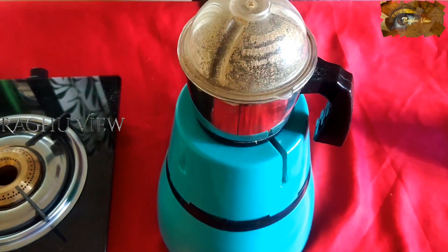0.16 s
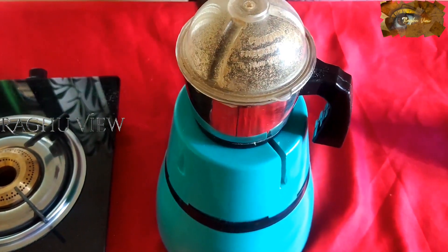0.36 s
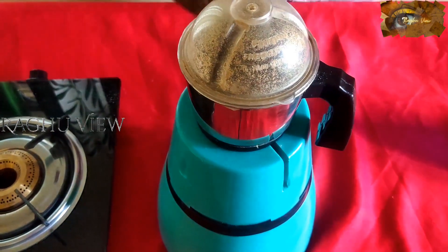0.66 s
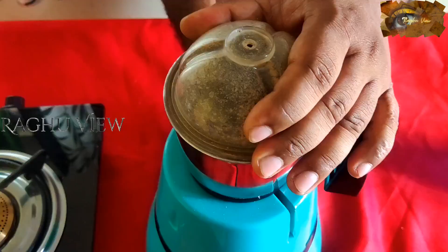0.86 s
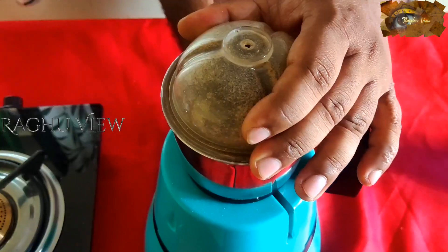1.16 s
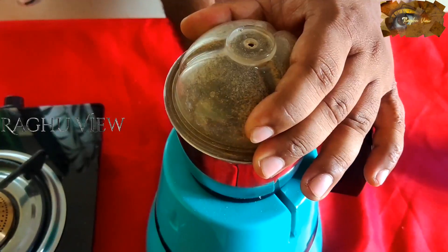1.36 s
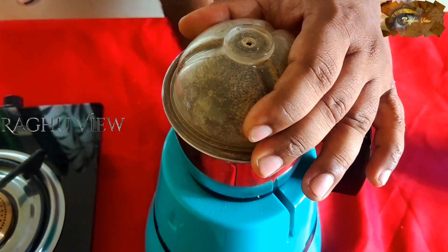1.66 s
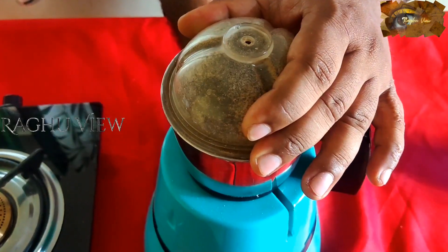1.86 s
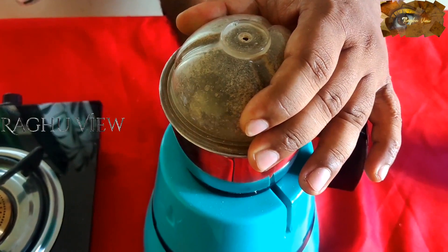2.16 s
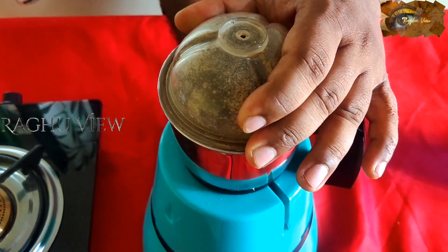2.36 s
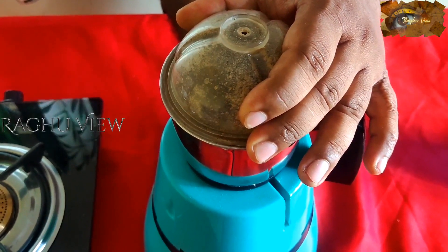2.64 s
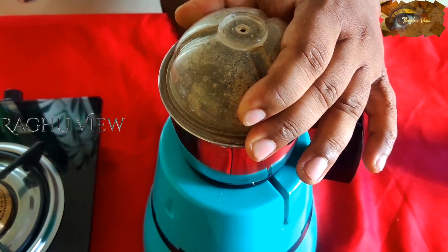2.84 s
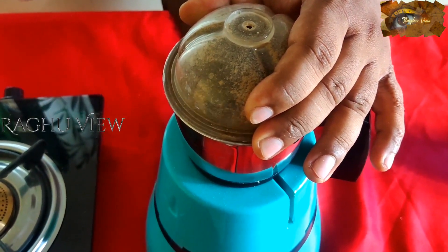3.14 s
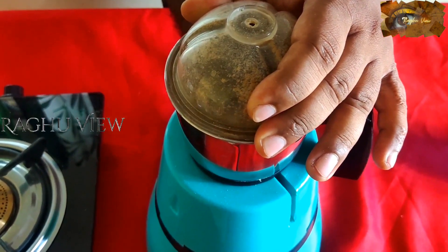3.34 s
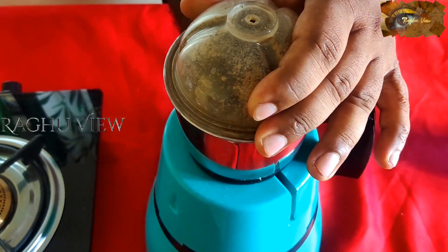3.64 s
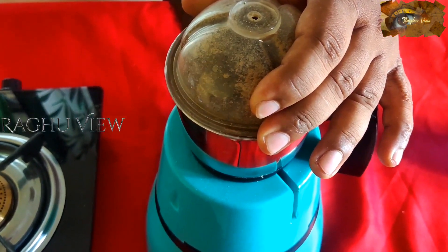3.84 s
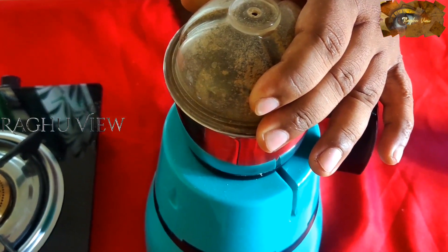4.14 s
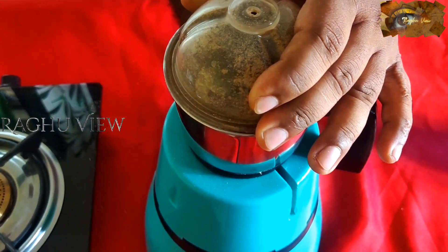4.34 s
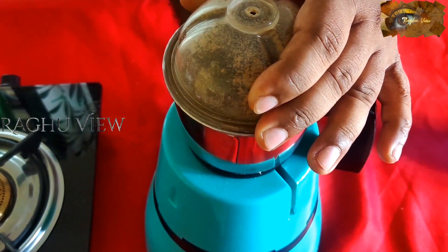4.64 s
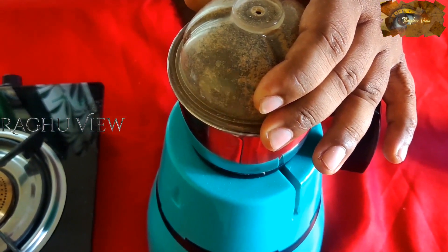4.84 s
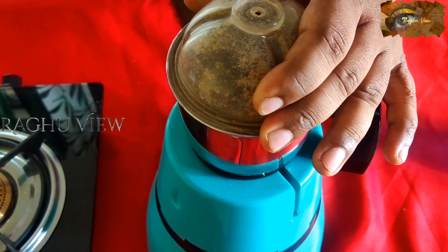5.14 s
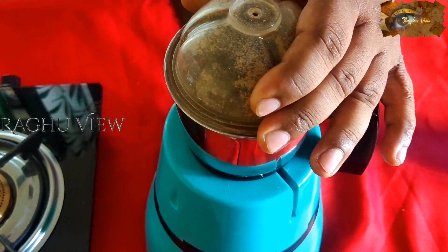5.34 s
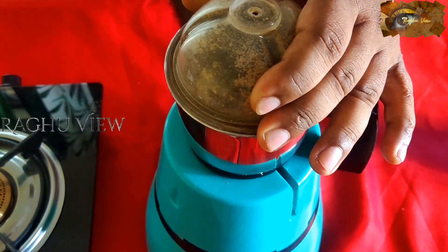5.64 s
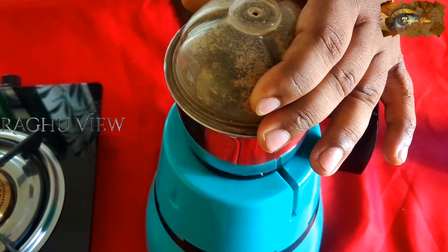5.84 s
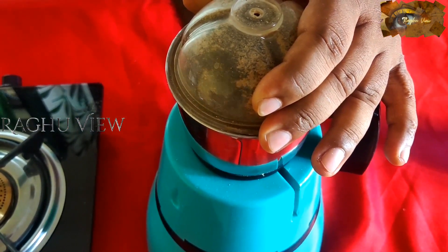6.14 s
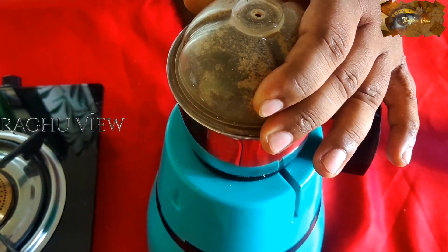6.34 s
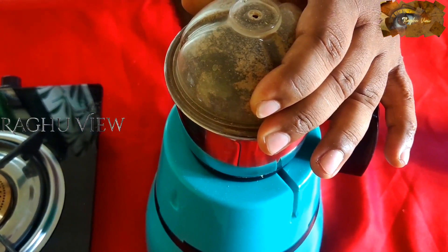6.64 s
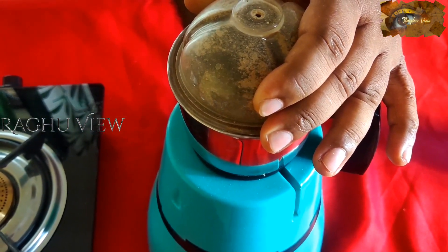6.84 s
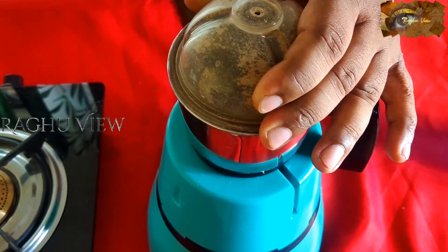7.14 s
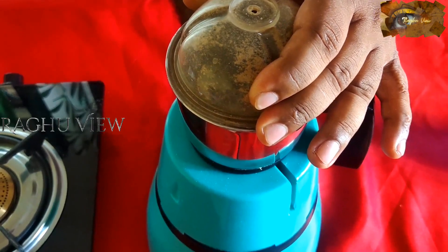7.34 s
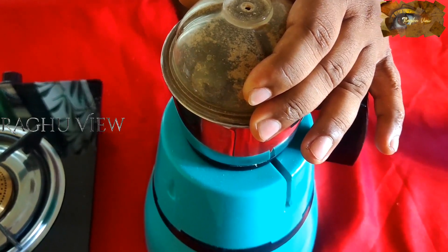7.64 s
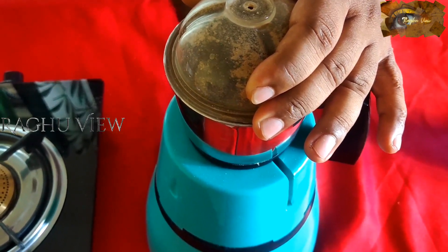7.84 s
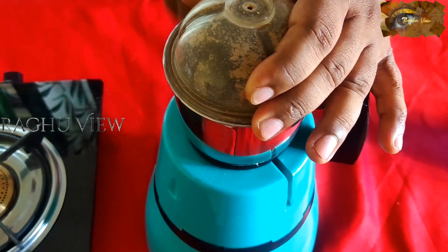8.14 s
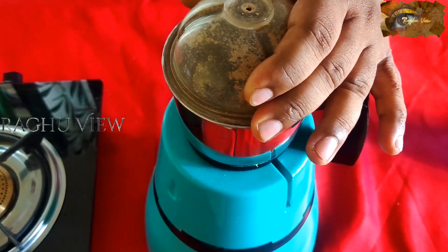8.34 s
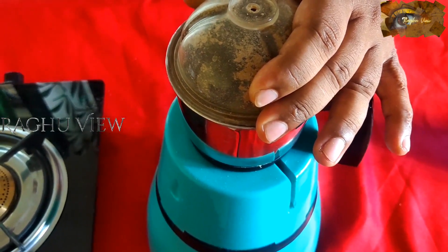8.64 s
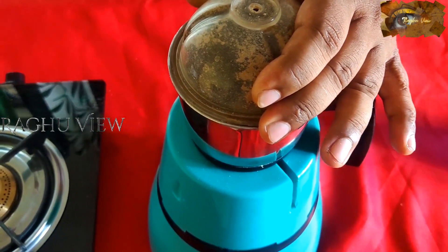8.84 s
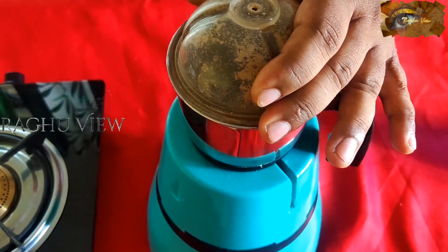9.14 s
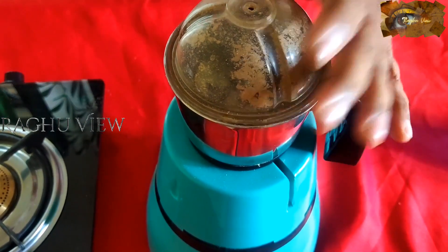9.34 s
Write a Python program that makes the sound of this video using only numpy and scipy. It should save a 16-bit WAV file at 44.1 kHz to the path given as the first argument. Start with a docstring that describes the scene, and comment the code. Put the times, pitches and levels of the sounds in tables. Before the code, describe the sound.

A brief knock and a dying rattle come first. Then a kitchen mixer grinder starts up, its motor whine quickly rising and holding while dry spice hisses against the ringing steel jar. Puffs of air thump on the close microphone. After about six and a half seconds the motor is switched off and winds down, the jar clacking on its drive until it stops.

```python
"""First comes a knock and a dying rattle; then a kitchen mixer grinder starts up with a loud hiss and whine.
Dry spice grains spray on its steel jar and make it ring, while the blades beat the air at up to about
214 turns a second. The jar rattles and knocks on its coupler (the drive joint), the plastic housing
drones, and puffs of air thump on the close microphone. Switched off, the rotor coasts to a clacking stop."""
import sys
import numpy as np
from scipy import signal
from scipy.fft import rfft, irfft, next_fast_len
from scipy.io import wavfile

SR = 44100
rng = np.random.default_rng(int(sys.argv[2]) if len(sys.argv) > 2 else 0)


def waveform_to_disk(signal):
    """Save audio, clipped to [-1, 1], as 16-bit WAV at the path in sys.argv[1]."""
    frames = np.transpose(np.atleast_2d(signal))
    scaled = np.clip(frames, -1, 1) * 32767
    samples = np.round(scaled).astype(np.int16)
    wavfile.write(sys.argv[1], SR, samples)


N = 418499
SWITCH_ON_S, SWITCH_OFF_S = 0.75, 7.375
ECHO_S, CUTOFF_HZ = 0.45, 15600  # time for the kitchen's echo to fall 60 dB; highest pitch kept

# tone of the grains' hits; a positive pan leans left: (pitch [Hz], level [dB], pan [dB])
GRAIN_TONE = [(90, -22, -11.5), (201, -6.5, -8), (600, -11, -0.5), (2240, -7.5, 1.5), (2870, -5, -1),
              (3910, -6.5, 1), (4910, -9, -1.5), (5930, -1.5, 3), (6980, 3.5, 4.5), (7730, -2.5, -3),
              (8580, 1, -2.5), (10520, -6, -0.5), (11840, -5, 0), (13900, -1, 4.5), (15500, -5, -4.5)]
def grain_hiss(hail, speed, crest_s=0.842, surge_period_s=0.355):
    """Spice sprays on the steel wall; coarse grains are the brightest, and they come in surges."""
    coarse = coarseness()
    surge_db = 0.5 * np.sqrt(coarse) * np.cos(2 * np.pi * since(crest_s) / surge_period_s)
    gain = loudness(speed, powered_db=-12.5, coarse_db=-0.7, coasting_db=-21.5,
                    knee_speed=55.3, steepness=1.42, die_db_per_s=131)
    cushion = swirling() ** 3  # flying powder softens the hits and is the first thing to settle
    powered_db = -8 + 11.5 * np.cbrt(coarse)
    coasting_db = 6 + 2 * np.log2(speed / 100)
    treble_db = cushion * powered_db + (1 - cushion) * coasting_db
    spray = stereo_noise(GRAIN_TONE) * hail
    treble = spray - butter(spray, 10000, "low", order=1)
    return from_db(surge_db) * gain * (spray + treble * (from_db(treble_db) - 1))


def grain_hits(speed, turns, per_turn=28, bunching=0.4, ring_s=0.00075, echo=0.5):
    """Loudness of a hail of hits: they bunch once a turn, come in clumps and thin as the rotor slows."""
    sweep = np.cos(2 * np.pi * turns) + np.cos(4 * np.pi * turns) / 2
    hits_per_s = per_turn * speed * (1 + bunching * sweep)
    hits = rng.random(N) < hits_per_s / SR
    sizes = from_db(3.5 * np.minimum(rng.exponential(1, N), 4) + 1.76 * drift(25))
    power = fade(fade(hits * sizes ** 2 / speed, ring_s), 0.000099)
    power = power / np.mean(power[speed > 100])
    return np.sqrt(with_echo(power, echo) / (1 + echo))


# notes of the steel wall: (pitch [Hz], width [Hz], left boost [dB], right boost [dB])
WALL_NOTES = [(2727, 58, 7, 5.5), (3100, 110, 4.5, 2), (3590, 240, 5.5, 5.5), (4070, 107, 10, 7),
              (4720, 39, 14.5, 6), (5330, 71, 5.5, 6.5), (6130, 75, 2.5, 5.5), (6300, 130, 2.5, -1),
              (7120, 50, 0.5, 5.5), (7310, 84, 3.5, -1), (7720, 80, 8, -5), (8530, 120, 0, 6.5),
              (9340, 77, 8.5, 0), (10070, 33, 11.5, 7), (11030, 130, 2.5, 9), (11950, 110, 13, 0),
              (13200, 45, -2, 2), (12900, 250, 6.5, -0.5), (13630, 110, 2.5, -3), (15000, 40, 0.5, 4)]
def steel_ring(strikes):
    """Whatever strikes the wall makes it ring."""
    return strikes + sum((from_db([[left_db], [right_db]]) - 1) * band(strikes, hz, width)
                         for hz, width, left_db, right_db in WALL_NOTES)


# the whine's weaker tones: (multiple of rotor speed [x], relative level [dB], pan [dB])
WEAK_TONES = [(1, -26.5, -21.5), (2, -12.5, -0.5), (4, -8.5, -3.5), (5, -8.5, 11.5), (6, -6, -12),
              (7, -13, 10), (8, -13, -14), (14, -18.5, -3.5), (15, -14.5, 1), (19, -10.5, 8)]
def blade_whine(speed, turns, flutter=0.13, rough=0.4, rise_s=0.51, fade_db_per_s=32):
    """Three blades beat the air; the swirling powder makes the higher tones flutter."""
    slack = 1 - swirling()  # without drive the coupler is loose, and the tones blur
    phase = 2 * np.pi * (turns + 0.0055 * drift(14) + 0.02 * slack * drift(30))
    running = np.minimum(since(SWITCH_ON_S) / rise_s, 1) * from_db(-fade_db_per_s * since(SWITCH_OFF_S))
    base_db = -22 + 0.93 * drift(3)

    def tone(k, unrest):
        """A tone at k times the rotor speed, wavering a little differently on each side."""
        waver = np.array([drift(28) + 1j * drift(35) for side in range(2)]) + drift(27) + 1j * drift(35)
        steady = np.exp(1j * (k * phase + rng.uniform(0, 2 * np.pi)))
        return np.sqrt(2) * np.real((1 + unrest * waver / 2) * steady)

    # the blade tone swells at the note of the air in the jar; coarse spice damps it
    in_tune = nearness(3 * speed, 635, 19) ** 2
    damping = coarseness() ** 2
    blade_db = -16.5 - 1.5 * freeing() - 8 * damping + 0.93 * drift(2.4)
    out = from_db(blade_db) * in_tune * panned(-5.5 * in_tune ** 2) * tone(3, flutter)
    # three higher tones swell where they meet a note of the jar
    seventh_gain = from_db(base_db + 2.5 - 6 * slack) * nearness(7 * speed, 1410, 19) ** 2
    out += seventh_gain * panned(6) * tone(7, rough * 2)
    out += from_db(base_db + 1.5) * nearness(9 * speed, 1934, 42) * panned(1.6) * tone(9, rough * 1.05)
    out += from_db(base_db - 3.5) * nearness(10 * speed, 2054, 11) * tone(10, rough)
    weak_db = base_db - 2.5 - 4.8 * slack - 3 * damping
    for k, level_db, pan_db in WEAK_TONES:
        out += from_db(weak_db + level_db) * panned(pan_db) * tone(k, rough)
    return running * out


# the rotor's basic speed under power, rising as the load eases: (time [s], speed [turns/s])
POWERED_SPEED = [(0.8, 156.0), (0.82, 158.9), (0.85, 170.9), (0.92, 177.2), (0.97, 194.0), (1.11, 202.3),
                 (1.35, 205.9), (2.58, 209.6), (2.6, 211.8), (4.7, 212.8)]
def rotor_speed(drag_per_s=0.74, friction_turns_per_s2=70):
    """Turns a second: a slow creep, the powered run, then a coast against air drag and friction."""
    powered = np.interp(since(0), *np.transpose(POWERED_SPEED))
    powered = powered + 1.5 * freeing() + 0.22 * drift(2.5)  # the shifting load makes it wander
    offset = friction_turns_per_s2 / drag_per_s
    slowing = (powered + offset) * np.exp(-drag_per_s * since(SWITCH_OFF_S)) - offset
    return np.where(since(SWITCH_ON_S) > 0, np.maximum(slowing, 10), 15)


def swirling(hold_s=0.045, settle_s=0.037):
    """Share of the spice that the blades keep in the air: 1 under power, 0 once it has settled."""
    return (since(SWITCH_ON_S) > 0) * np.exp(-since(SWITCH_OFF_S + hold_s) / settle_s)


def coarseness(grind_s=1.5):
    """Share of the spice that is swirling and not yet powder."""
    return swirling() * np.exp(-since(SWITCH_ON_S) / grind_s)


def freeing(start_s=6.7, takes_s=0.6):
    """Rises from 0 to 1 as the powder packs on the wall and the blades run freer."""
    return np.minimum(since(start_s) / takes_s, 1)


def loudness(speed, powered_db, coarse_db, coasting_db, knee_speed, steepness, die_db_per_s):
    """Gain of a rattling part: it follows the spice, falls below the knee speed and dies at each stop."""
    first_stop_s, second_stop_s, fling_s = 0.061, 8.95, 0.018
    level_db = coasting_db + (powered_db - coasting_db) * swirling() + coarse_db * coarseness()
    slowing = (speed / np.hypot(speed, knee_speed)) ** steepness
    flung_up = np.sqrt(np.minimum(since(SWITCH_ON_S) / fling_s, 1))
    first_burst = from_db(-die_db_per_s * since(first_stop_s))
    second_burst = flung_up * from_db(-die_db_per_s * since(second_stop_s))
    return from_db(level_db) * slowing * np.where(flung_up > 0, second_burst, first_burst)


# notes of the jar and the air in it: (pitch [Hz], width [Hz], level [dB], pan [dB])
JAR_NOTES = [(623, 77, -5, 0), (803, 160, -7.5, 0.5), (1021, 130, -10.5, 3), (1377, 65, 1.5, 5.5),
             (1828, 73, -0.5, 3.5), (2025, 102, -1.5, 0.5), (2675, 160, -10.5, -2.5),
             (3545, 260, -13.5, -5), (4220, 110, -16.5, -4)]
def jar_rattle(speed, hail):
    """The grains and the loose coupler shake the jar, which rings at its own notes."""
    chatter = from_db(1.4 * drift(45))
    ringing = rms_one(resonate(stereo_noise() * hail * chatter, JAR_NOTES))
    return ringing * loudness(speed, powered_db=-22, coarse_db=4.5, coasting_db=-20.5,
                              knee_speed=44, steepness=1.46, die_db_per_s=144)


# tone of a knock: (pitch [Hz], level [dB], pan [dB])
KNOCK_TONE = [(150, -11, 2), (300, 3, 8), (1000, 6, -4), (2000, 1, -3), (2500, -4.5, 0), (4000, -2, 1.5),
              (5030, -4.5, -1), (6800, 6.5, 8), (9800, -16, -1), (13000, -13, 11), (16000, -10, 2)]
# knocks of the jar on its coupler: (time [s], relative level [dB])
JAR_KNOCKS = [(0.0404, -14.5), (7.6324, -16), (7.769, -10), (7.888, -8), (7.9034, -11), (7.9813, -9),
              (8.182, -5), (8.243, -4.5), (8.3394, -8), (8.5032, -5.5), (8.5587, -7), (8.593, -9),
              (8.634, -12), (8.6824, -11.5), (8.7836, -16.5), (8.8327, -11), (8.9702, -18), (9.222, -50),
              (9.233, -37), (9.2497, -33.5), (9.2634, -37), (9.278, -40)]
def jar_knocks(speed, ring_s=0.0027, rise_s=0.00059, echo=0.29):
    """The jar clacks on its coupler, brighter when the rotor is fast; the kitchen adds a short tail."""
    power = with_echo(fade(bursts(JAR_KNOCKS, ring_s), rise_s), echo)
    body = butter(stereo_noise(KNOCK_TONE), 150, "high")
    edge = from_db(-5) * speed / 100 * rms_one(butter(stereo_noise(), 8000, "high"))
    return from_db(-8) * np.sqrt(power) * (body + edge)


# strong puffs of air on the microphone: (time [s], relative level [dB], pan [dB])
STRONG_PUFFS = [(0.798, -3.5, -5), (0.863, -7.5, 3), (0.892, -7, 20), (1.001, -9, -16.5),
                (1.043, -10, -19.5), (1.242, 0, -7.5), (1.307, -6.5, -22), (1.359, -5.5, -17),
                (1.576, -10.5, -18), (1.727, -1, -5), (1.897, -4, -20.5), (1.941, -2.5, -27.5),
                (2.055, -3, -24.5), (2.46, -7, -16), (2.514, -2, -27), (2.533, -9, -21), (2.654, -6, -19.5),
                (3.089, -12.5, 15), (3.16, -5.5, -18), (3.209, -6.5, -25.5), (3.286, -2, -21),
                (3.685, -5.5, -22), (3.821, -12.5, -6.5), (3.907, -12, -8), (4.036, -10.5, -21),
                (4.423, -3, -29), (4.443, -8.5, -14), (4.615, -4.5, -17), (5.314, -6.5, -18),
                (5.462, -10.5, -9.5), (5.556, -12.5, -10), (6.364, -10, -16.5), (6.57, -16, 5),
                (7.849, -17, -20)]
def air_puffs(puffs, centre_hz=188, eddy_s=0.016):
    """Each puff is one short swing of air pressure, with a little churning air behind it."""
    out = np.zeros((2, N))
    t = np.arange(-SR // 50, SR // 50) / SR
    dull_noise = butter(rng.standard_normal((2, N)), 410, "low", order=1)
    eddies = rms_one(butter(dull_noise, [85, 1000], "band"))
    for (s, level_db, pan_db), (pitch, lag, sign) in zip(puffs, rng.standard_normal((len(puffs), 3))):
        side_t = t + 0.0011 * lag * np.array([[1], [-1]])  # one side gets the puff first
        spread = (np.pi * centre_hz * np.exp(0.23 * pitch) * side_t) ** 2
        swing = np.sign(sign) * (1 - 2 * spread) * np.exp(-spread)
        start = int(s * SR) - len(t) // 2
        out[:, start:start + len(t)] += from_db(level_db - 0.9 - abs(pan_db) / 2) * panned(pan_db) * swing
    return out + from_db(-2) * np.sqrt(fade(out ** 2, eddy_s)) * eddies


def weak_puffs(count=60, start_per_s=11):
    """More rows like the strong puffs: small, random, and rarer as the spice is ground."""
    chance, spread = rng.random((count, 2)), rng.standard_normal((count, 2))
    run_s = SWITCH_OFF_S - SWITCH_ON_S
    times = SWITCH_ON_S + run_s * chance[:, 0]
    per_s = start_per_s * coarseness()[(times * SR).astype(int)] ** 0.8
    rows = np.transpose([times, -13.5 + 2.5 * spread[:, 0], -14 + 7 * spread[:, 1]])
    return rows[chance[:, 1] < per_s * run_s / count].tolist()


def puff_crackle(puffs, ring_s=0.012):
    """A bright crackle comes with every puff."""
    power = bursts([(s, level_db) for s, level_db, pan_db in puffs], ring_s)
    bright_noise = rms_one(butter(stereo_noise(), 7500, "high", order=1))
    return from_db(-7) * np.sqrt(power) * panned(-2) * bright_noise


# notes of the plastic housing: (pitch [Hz], width [Hz], level [dB], pan [dB])
HOUSING_NOTES = [(234, 92, -2.5, -1.5), (289, 52, 3, -0.5), (385, 125, -7.5, -1.5), (678, 50, -7.5, -1),
                 (799, 60, -7.5, -5.5)]
def housing_drone(speed):
    """The shaken housing drones at its own low notes."""
    drone = rms_one(butter(resonate(stereo_noise(), HOUSING_NOTES), 130, "high"))
    return drone * loudness(speed, powered_db=-31.5, coarse_db=3, coasting_db=-28,
                            knee_speed=27, steepness=1.3, die_db_per_s=110)


def rotor_hum(speed, turns, powered_db=-34.5, coasting_db=-27.5):
    """The unbalanced rotor shakes the housing most near one speed; its fan stirs a low rumble."""
    force = (since(SWITCH_ON_S) > 0) * np.minimum(speed / 185, 1) ** 2
    level_db = coasting_db + (powered_db - coasting_db) * swirling()  # the spinning load steadies it
    gain = from_db(level_db + 3.5 * drift(14)) * nearness(speed, 186, 30)
    shake = gain * np.sin(2 * np.pi * turns + 0.7 * drift(20))
    fan = from_db(-49 + 3.2 * drift(9)) * rms_one(butter(rng.standard_normal((2, N)), [70, 170], "band"))
    return force * (shake + fan)


# the housing rocks on its feet: (time [s], pitch [Hz], level [dB])
HOUSING_BOOMS = [(0.388, 290, -54.5), (8.735, 289, -31), (8.833, 291, -26), (8.9, 292, -28),
                 (9.234, 285, -43), (9.39, 525, -59), (9.445, 520, -64)]
def housing_rocking(ring_s=0.24, rise_s=0.0027):
    """The housing gives a short hollow boom each time it settles."""
    out = 0
    for s, hz, level_db in HOUSING_BOOMS:
        age = since(s)
        gain = from_db(level_db - 60 * age / ring_s) * (1 - np.exp(-age / rise_s))
        out = out + gain * np.sin(2 * np.pi * hz * age)
    return out


def room_hush():
    """A very faint, low noise lies under everything."""
    return from_db(-85.5) * rms_one(butter(stereo_noise(), [120, 700], "band", order=1))


def with_echo(power, share):
    """The kitchen's echo adds a fading tail to a sound's power."""
    return power + share * fade(power, ECHO_S / np.log(1e6))


# how alike the left and right sides are: (pitch [Hz], likeness [0 to 1])
SIDE_LIKENESS = [(100, 1), (700, 0.73), (2000, 0.45), (4000, 0.16), (6000, 0.16), (15000, 0.033)]
def stereo_noise(tone=None):
    """Noise that is alike on both sides in the bass and unrelated in the treble, shaped by a tone table."""
    size = next_fast_len(N)
    hz = np.arange(size // 2 + 1) * SR / size
    mid, side = rfft(rng.standard_normal((2, size)))
    alike = np.clip(at_hz(SIDE_LIKENESS, hz)[0], -1, 1)
    both = np.sqrt(1 + alike) * mid + np.sqrt(1 - alike) * side * [[1], [-1]]
    if tone is not None:
        level_db, pan_db = at_hz(tone, hz)
        bass_cut = hz / (hz + tone[0][0])
        both = both * from_db(level_db) * panned(pan_db) * (hz < CUTOFF_HZ) * bass_cut
    return rms_one(irfft(both, size)[:, :N])


def at_hz(rows, hz):
    """Read a table's columns at the given pitches."""
    known_hz, *columns = np.transpose(rows)
    return [np.interp(np.log(hz + 1), np.log(known_hz), column) for column in columns]


def resonate(x, notes):
    """Make a sound ring at several notes, every second one flipped in sign."""
    return sum((-1) ** k * from_db(level_db) * panned(pan_db) * band(x, hz, width)
               for k, (hz, width, level_db, pan_db) in enumerate(notes))


def band(x, hz, width):
    """Make a sound ring at one note, with gain 1 at that pitch."""
    r = np.exp(-np.pi * width / SR)
    feedback = [1, -2 * r * np.cos(2 * np.pi * hz / SR), r * r]
    return signal.lfilter([1, 0, -1], feedback, x + 1e-18) * (1 - r * r) / 2


def nearness(hz, centre_hz, width_hz):
    """How well a tone matches a ringing note: 1 when in tune, less on either side."""
    return 1 / np.sqrt(1 + ((hz - centre_hz) / width_hz) ** 2)


def bursts(events, ring_s):
    """Power that jumps at each (time [s], level [dB]) and dies away."""
    clicks = np.zeros(N)
    for s, level_db in events:
        clicks[int(s * SR)] += from_db(level_db)
    return fade(clicks ** 2, ring_s) * ring_s * SR


def fade(x, seconds):
    """Smear each click into a fading tail of the same area."""
    r = np.exp(-1 / (seconds * SR))
    return signal.lfilter([1 - r], [1, -r], x + 1e-18)


def drift(hz):
    """A smooth random wobble of typical size 1; more hz makes it quicker."""
    r = np.exp(-80 * np.pi * hz / SR)
    slow = signal.lfilter([1], [1, -2 * r, r * r], rng.standard_normal(N // 40 + 2002))[2000:]
    return np.interp(np.arange(N) / 40, np.arange(len(slow)), rms_one(slow))


def butter(x, hz, kind, order=2):
    """Keep the lows, the highs or a band between."""
    return signal.sosfilt(signal.butter(order, hz, kind, fs=SR, output="sos"), x)


def since(s):
    """Seconds gone by since a moment; 0 before it."""
    return np.maximum(np.arange(N) / SR - s, 0)


def panned(pan_db):
    """Left and right gains; positive leans left."""
    return from_db(np.array([[1], [-1]]) * pan_db / 2)


def from_db(db):
    """Decibels to gain."""
    return 10 ** (np.asarray(db) / 20)


def rms_one(x):
    """Scale to an average power of 1."""
    return x / np.sqrt(np.mean(x ** 2) + 1e-20)


def scene():
    """One rotor drives hiss, whine and rattle; while it coasts, hiss and jar rattle lean left."""
    speed = rotor_speed()
    turns = np.cumsum(speed) / SR
    coasting = (1 - swirling()) * (since(SWITCH_OFF_S) > 0)
    hail = grain_hits(speed, turns)
    jar = jar_rattle(speed, hail) * panned(1.5 * coasting)
    housing = housing_drone(speed) + housing_rocking()
    puffs = list(STRONG_PUFFS) + weak_puffs()
    knocks = jar_knocks(speed)
    hiss = grain_hiss(hail, speed) * panned(3 * coasting)
    wall = steel_ring(hiss + knocks + puff_crackle(puffs))
    jar = jar + from_db(2.5) * resonate(knocks, JAR_NOTES)
    jar = np.array([np.roll(jar[0], 2), jar[1]])  # the jar is a little nearer the right side
    motor = blade_whine(speed, turns) + rotor_hum(speed, turns)
    return wall + motor + jar + housing + room_hush() + air_puffs(puffs)


def record(dry, quiet_db=-52, ceiling=0.87):
    """Quiet tails are turned down further, the highest peaks are rounded and the top treble is cut."""
    level_db = 10 * np.log10(fade(np.mean(dry ** 2, axis=0), 0.006) + 1e-14)
    expanded = dry * from_db(np.clip(0.35 * (level_db - quiet_db), -12, 0))
    rounded = expanded / (1 + (expanded / ceiling) ** 6) ** (1 / 6)
    return signal.sosfilt(signal.ellip(12, 0.2, 70, CUTOFF_HZ, fs=SR, output="sos"), rounded)


dry = scene()
out = record(dry)
waveform_to_disk(out)
```